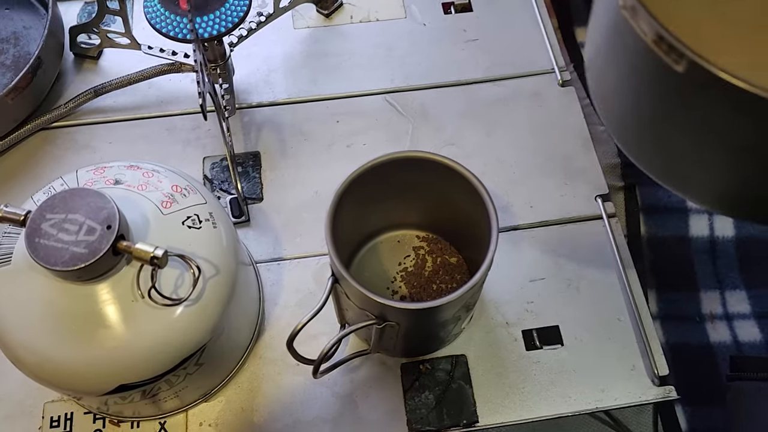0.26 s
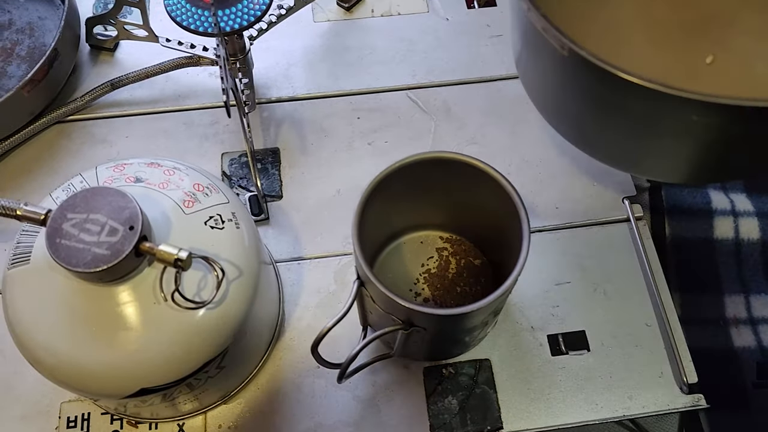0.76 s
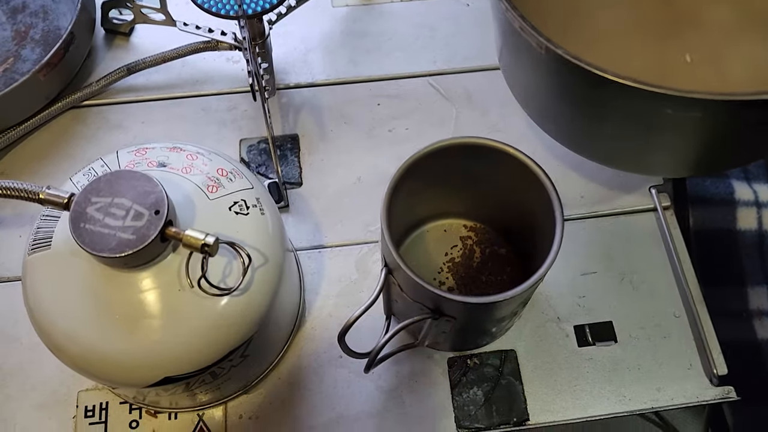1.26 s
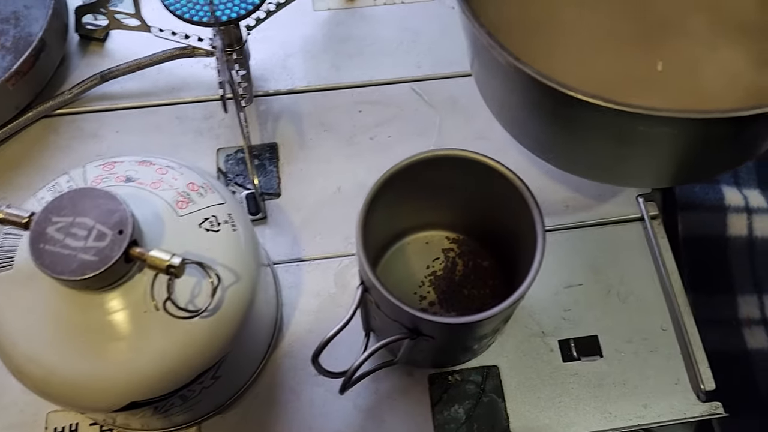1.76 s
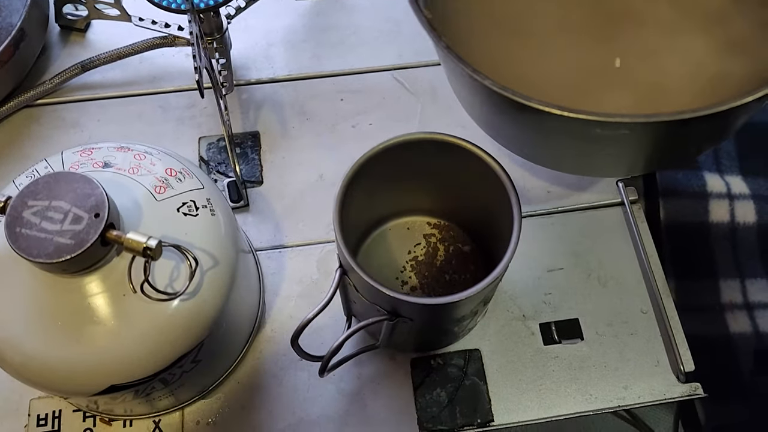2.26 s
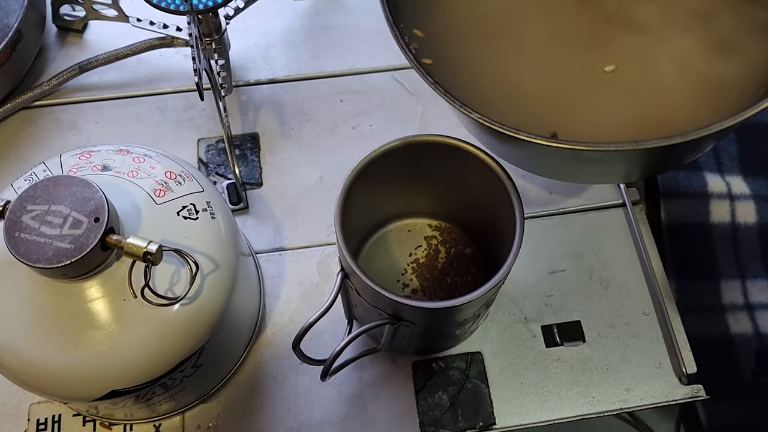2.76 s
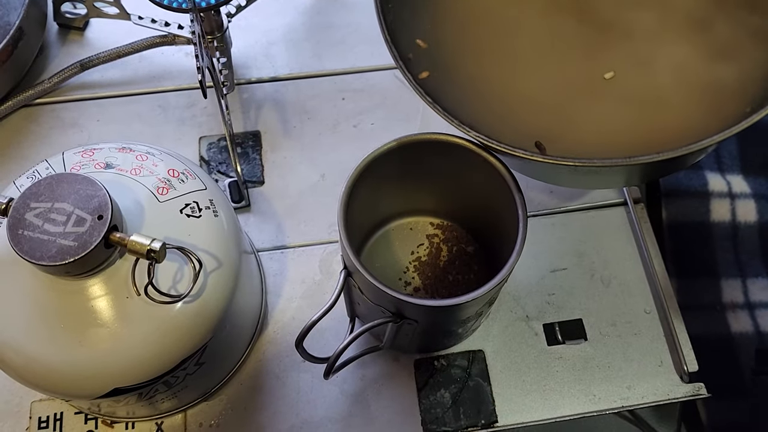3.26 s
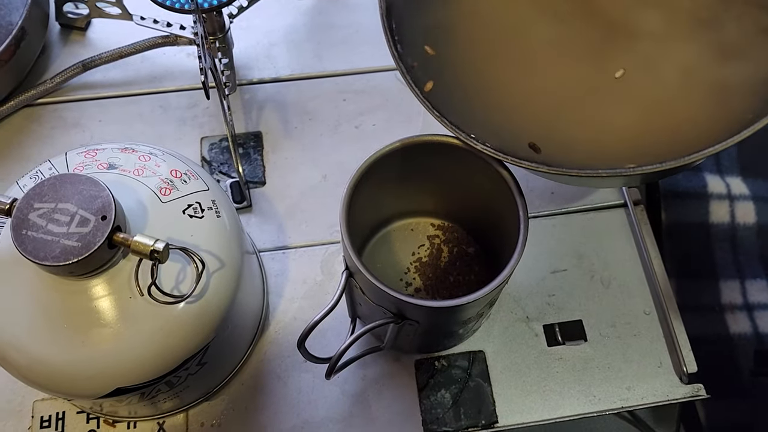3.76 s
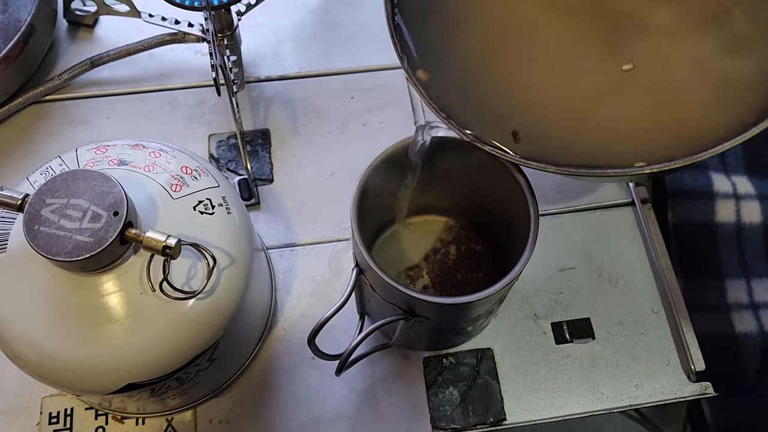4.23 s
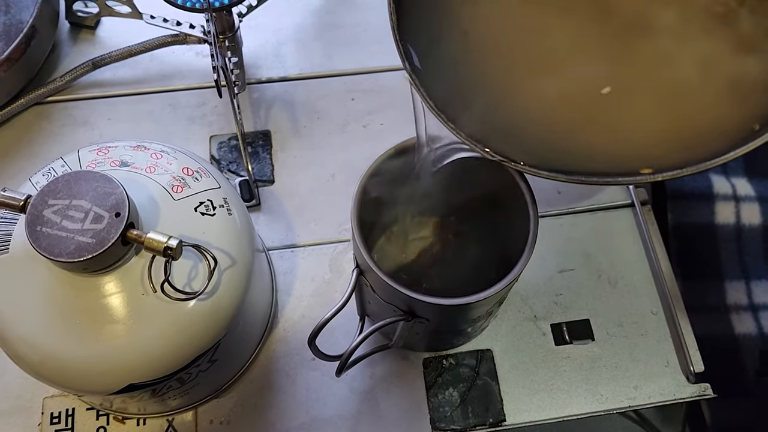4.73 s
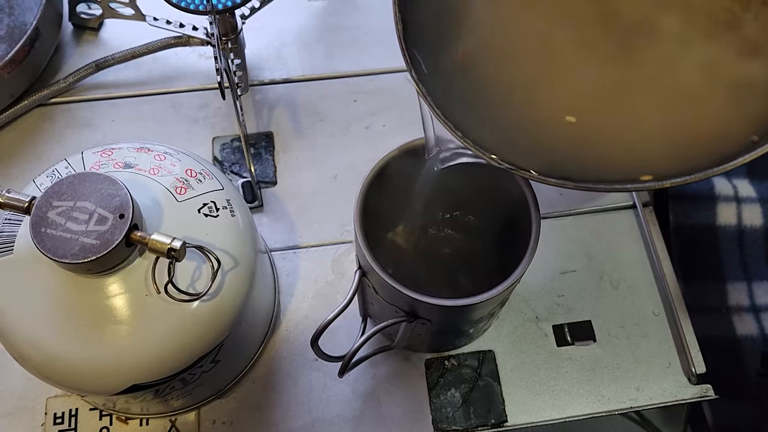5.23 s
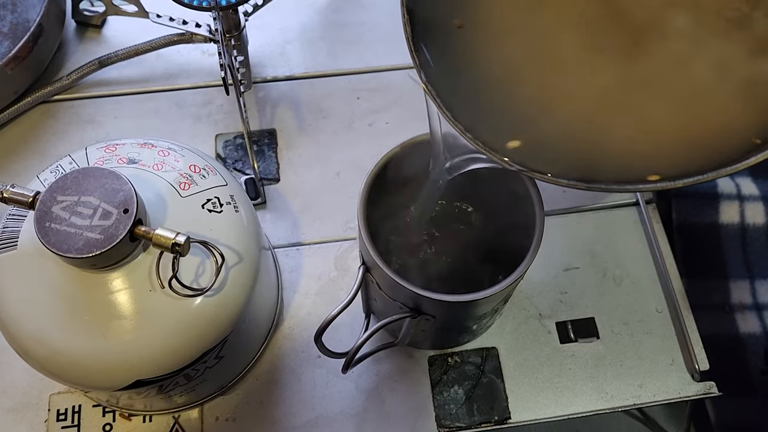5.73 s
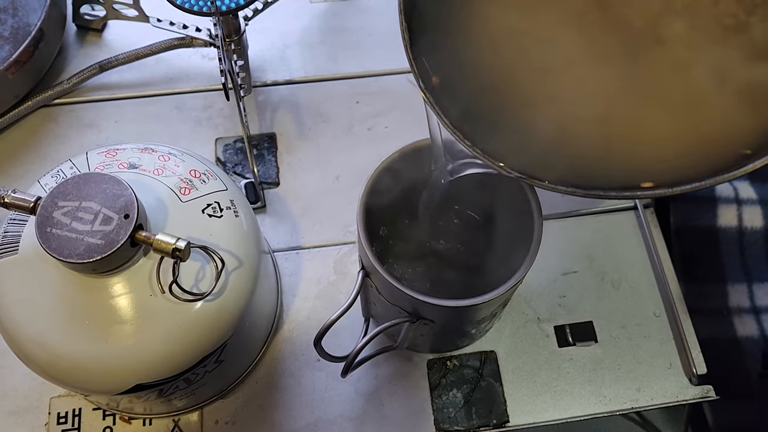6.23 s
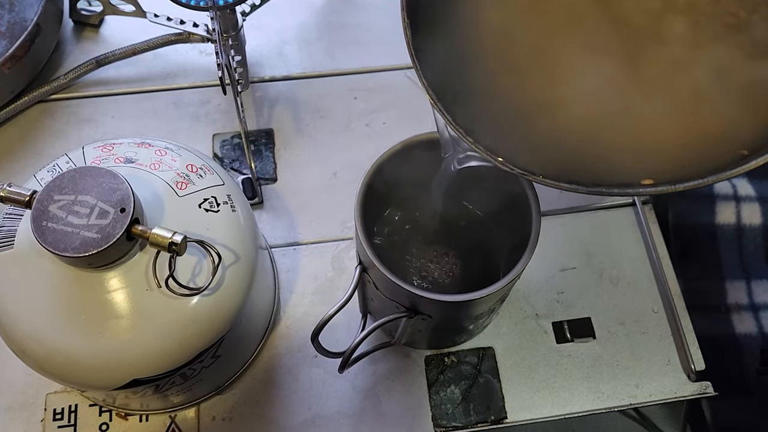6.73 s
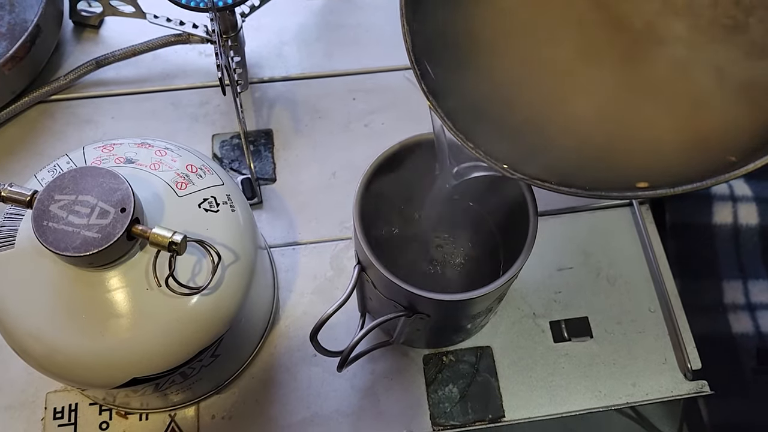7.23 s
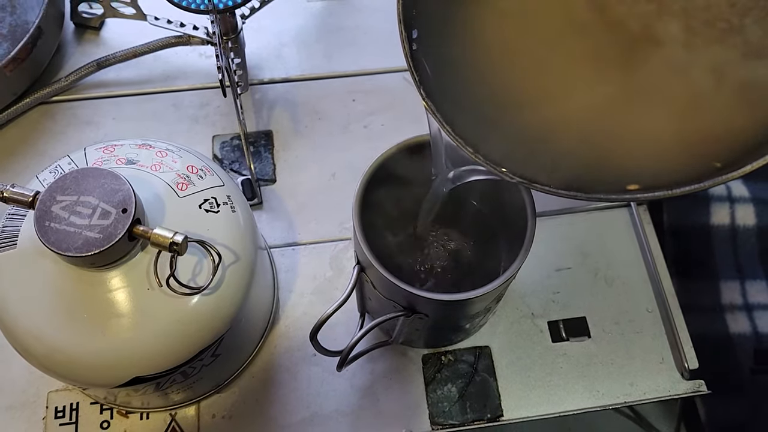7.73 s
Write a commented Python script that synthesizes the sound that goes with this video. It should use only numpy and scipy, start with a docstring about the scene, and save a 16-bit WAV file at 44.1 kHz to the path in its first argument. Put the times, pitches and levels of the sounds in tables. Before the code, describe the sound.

Inside a tent, a hand-held microphone picks up the constant rumble and hiss of a nearby gas burner, the hiss shifting slightly in tone. A pot clicks and knocks lightly as it is lifted. A little past halfway, water splashes gently into a metal mug slightly to the left, with short plops and ticks. The pour ends, and in the last instant the burner drops in level and moves right.

```python
"""At a table with a gas camping stove, a hand-held two-port microphone close to the burner.
The flames roar low under the hiss of the gas jet, whose colour shifts as the hand turns the microphone.
A pot is lifted with a few small knocks, then hot water is poured into a metal mug: bubbles ring as
short plops and droplets tick on the wall.
In the last moment the burner sounds quieter, thinner and further right."""
import sys
import numpy as np
from scipy import signal
from scipy.fft import rfft, irfft, next_fast_len
from scipy.io import wavfile
from scipy.ndimage import uniform_filter1d

SR = 44100
rng = np.random.default_rng(int(sys.argv[2]) if len(sys.argv) > 2 else 0)


def persist_wave(psi):
    """Save psi, clipped to +-1, as 16-bit WAV."""
    counts = np.round(np.clip(psi, -1, 1) * 32767).astype(np.int16)
    wavfile.write(sys.argv[1], SR, np.atleast_2d(counts).T)


N = 352342
POUR_START_S, POUR_STOP_S = 4.5, 7.3
POT_PAN_DB, HANDLE_PAN_DB, MUG_PAN_DB, SNAP_PAN_DB = 8.5, -2, 9, 7  # left minus right


def flame(level_db=-42.5):
    """The ring of small flames rumbles in lumps, close to the microphone."""
    # Each row: frequency in Hz, relative level at the left and right port in dB.
    roar_spectrum = [(15, -52, -47), (28, -27, -38), (46.5, -15, -23), (68.3, -11.5, -12), (111, -5.5, -6),
                     (125.5, -1.5, -1.5), (137.6, 3, 0), (147, -4, -6), (162, -5.5, -7.5),
                     (192, -10, -10.5), (276, -10.5, -11.5), (318, -17.5, -17), (410, -15, -20.5),
                     (720, -15.5, -23), (846, -20.5, -23), (926, -24, -25), (960, -35.5, -43),
                     (1250, -49, -49.5)]
    hz, _ = stft_grid(4096)
    field_db = spectrum_at(roar_spectrum, hz)[..., None]
    roar = turbulence(field_db, size=4096, patchy_db=0.54, flicker_db=0.14, flicker_s=0.041)
    return roar * gain_of(level_db)


def jet(level_db=-49.5, pass_s=1.47, pass_width_s=0.3):
    """Gas hisses through the nozzle; its colour shifts as the microphone turns and the pot passes."""
    # The bare hiss. Each row: frequency in Hz, relative level left and right in dB.
    hiss_spectrum = [(680, -11, -1), (960, -4, -11), (1080, -2, -0.5), (1460, -3, -25.5), (1880, 0, -14),
                     (2390, -11.5, -11.5), (3340, 0, -10), (3720, -3, -11), (5440, 0, 0.5),
                     (6760, -1.5, -4), (7900, -1, -4.5), (10000, -6.5, -6.5), (12100, -9, -10),
                     (13500, -8.5, -15), (15900, -1.5, -8)]
    # Resonances and notches of the burner tube and its surroundings. Each row: centre and width in Hz,
    # then left and right dB at rest, per unit of turn and with the pot near, then shift in Hz per unit.
    resonances = [(4636, 317, 16, 9.5, 1.5, -7, -2, -7, -18), (6350, 490, 4.5, 1.5, -4.5, 2, -1, -5, -60),
                  (8930, 770, 4, 7, -1, -2.5, -2, -3, -480), (11300, 690, -4, 9.5, -2, 2.5, 2, 0, 89),
                  (7540, 580, 4.5, -0.5, -3.5, -7, 1, -5, 150), (3296, 280, -7.5, 0, -3, 2, -1, -3, 30),
                  (5700, 410, -1.5, -21, 4, 6, 8.5, 6, 26), (6860, 360, -13, 4, 15, 1.5, 1, 5, 108),
                  (9500, 510, -7.5, -3, 7, 7, 6, 6, -100), (10300, 420, 0, -8, -3, 4, -3, 2, 30),
                  (3560, 220, -1.5, 2, 5.5, 4, 7, -1, 30), (3800, 210, 1, 1, -8, -6, -4, 1, 30),
                  (2130, 130, 1, 3, 4, 5, -3, -2, 30), (13800, 600, 5.5, 6, -2, -4, 1, 3, 30),
                  (13000, 840, 1, -2, 2, 7, -1, -1, 30)]
    # Table top, canister and pot throw the hiss back. Each row: delay in ms, left and right share,
    # change of delay in ms per unit of turn.
    echoes = [(.75, 0.2, 0.12, 0.052), (1.6, 0.064, 0.14, -0.12), (2.3, 0.16, 0.084, 0.11),
              (3.4, 0.21, 0.096, -0.14), (4.9, 0.43, 0.16, 0.15)]
    # The hand slowly turns the microphone. Each row: time in seconds, turn from -1 to 1.
    mic_turn = [(0, 1), (.6, 0.75), (1.1, 0.25), (1.7, -0.064), (2.1, -0.32), (2.7, -0.022), (4.7, 0.069),
                (5.6, -0.4), (7.9, -0.3)]
    hz, t = stft_grid(512)
    turn = np.interp(t, *np.transpose(mic_turn))
    pot_near = np.exp(-((t - pass_s) / pass_width_s) ** 2)
    field_db = spectrum_at(hiss_spectrum, hz)[..., None] - 60 * (hz < 600)[:, None]
    for centre, width, left, right, left_turn, right_turn, left_pot, right_pot, shift in resonances:
        bell = np.exp(-2 * ((hz[:, None] - centre - shift * turn) / width) ** 2)
        ports_db = np.array([left + left_turn * turn + left_pot * pot_near,
                             right + right_turn * turn + right_pot * pot_near])
        field_db = field_db + bell * ports_db[:, None]
    comb = 1
    for ms, left, right, drift in echoes:
        late = np.exp(-2j * np.pi * np.outer(hz, ms + drift * turn) / 1000)
        comb = comb + np.array([left * late, right * late])
    field_db = field_db + 20 * np.log10(abs(comb) + 1e-3)
    hiss = turbulence(field_db, size=512, patchy_db=1.16, flicker_db=0.33, flicker_s=0.019)
    return hiss * gain_of(level_db)


def turbulence(field_db, size, patchy_db, flicker_db, flicker_s):
    """Rushing gas at both ports: noise of RMS 1 coloured by field_db, with drifting patches and flicker."""
    # Each row: frequency in Hz, likeness of the two ports from 0 to 1.
    port_likeness = [(150, 1), (300, 0.98), (850, 0.97), (1000, 0.83), (1700, 0.8), (2600, 0.6),
                     (3900, 0.26), (4650, 0.64), (5000, 0.6), (5350, 0.37), (5700, 0.7), (6050, 0.64),
                     (7000, 0.34), (8300, 0.55), (8800, 0.83), (9200, 0.25), (9500, 0.4), (10000, 0.55),
                     (11000, 0.3), (13000, 0.1)]
    # Each row: frequency in Hz, phase lead of the left port in radians.
    port_lead = [(0, 0), (80, 0), (200, .22), (260, .48), (370, 1.15), (900, 1), (1200, 2.6), (1900, 1.7),
                 (2500, 3.7), (3200, 4.3), (3900, 5.4), (4650, 6.9), (5340, 6.8), (6030, 8.8), (7400, 9.8),
                 (8300, 10.2), (8800, 12.3), (10100, 12.4), (10600, 10), (12300, 9.2), (13400, 12),
                 (16000, 15)]
    hz, t = stft_grid(size)
    left_re, left_im, own_re, own_im, patches = rng.standard_normal((len(t), len(hz), 5)).T
    patches = uniform_filter1d(patches, size=10, axis=0)
    patches = unit_rms(uniform_filter1d(patches, size=12, axis=1))
    memory = np.exp(-(t[1] - t[0]) / flicker_s)
    flicker = unit_rms(signal.lfilter([1], [1, -memory], rng.standard_normal(len(t))))
    # The delay between the ports changes while the pot stands in the way.
    from_s, to_s, sway_s = 0.8, 1.82, -0.000043
    in_the_way = np.clip(np.minimum(t - from_s, to_s - t) / 0.28 + .5, 0, 1)
    lead = np.interp(hz, *np.transpose(port_lead))[:, None]
    lead = lead + 2 * np.pi * np.outer(hz, sway_s * in_the_way)
    likeness = np.clip(spectrum_at(port_likeness, hz).T, 0, 1)
    left = left_re + 1j * left_im
    right = likeness * left * np.exp(-1j * lead) + np.sqrt(1 - likeness ** 2) * (own_re + 1j * own_im)
    spectra = np.array([left, right]) * gain_of(field_db + patchy_db * patches + flicker_db * flicker)
    _, noise = signal.istft(spectra, nperseg=size, noverlap=3 * size // 4)
    return unit_rms(noise[:, :N])


def pour(swarm_db=-64, swarm_spread_s=0.044, fizz_db=-62):
    """The stream traps large bubbles, each in a swarm of small ones; fine fizz fills the gaps."""
    # Each row: start in seconds, level in dB, pitch in Hz, cycles to die by 60 dB,
    # level of the slap against the bubble in dB.
    large_bubbles = [(4.583, -49, 2700, 11, -8), (4.617, -45.5, 2350, 16, -8), (4.695, -44, 2460, 16, -8),
                     (4.697, -46, 3550, 18, -8), (4.8814, -39, 1750, 6, -12), (4.938, -38.5, 2350, 15, -17),
                     (4.946, -43, 2050, 8, -11), (4.9845, -43, 1650, 2, -6), (5.110, -49, 2500, 8, -8),
                     (5.122, -47, 1500, 8, -2), (5.127, -49, 1550, 7, -8), (5.1585, -46, 1590, 14, -11),
                     (5.1642, -49, 1450, 10, -10), (5.389, -43, 1560, 9, -10), (5.415, -47, 1300, 8, -10),
                     (5.4475, -35.5, 1390, 12, -20), (5.448, -36.5, 3550, 17, -16),
                     (5.4658, -35, 1030, 14, 0), (5.4803, -30.5, 1050, 11, -14),
                     (5.5072, -35, 990, 7, -1.5), (5.5178, -44, 940, 8, -8), (5.583, -43, 1050, 4, -5),
                     (5.619, -43, 2020, 5, -13), (5.829, -43.5, 1010, 14, -6), (5.938, -52, 1800, 5, -4),
                     (5.944, -47, 1110, 16, -10), (5.9745, -47, 1050, 10, -8),
                     (6.0242, -49.5, 1060, 14, -6), (6.059, -47, 1010, 9, -6),
                     (6.0713, -43.5, 1410, 12, -1), (6.128, -50, 1000, 8, -7), (6.195, -52, 1900, 8, -6),
                     (6.213, -51, 1050, 14, -6), (6.2996, -39.5, 1250, 8, -6), (6.319, -42, 1100, 5, -9),
                     (6.340, -52, 1750, 12, -8), (6.349, -53, 1500, 10, -8), (6.3885, -47, 1000, 3, -2),
                     (6.402, -47, 1052, 6, -3), (6.424, -43.5, 1080, 6, -5), (6.456, -44.5, 1000, 5, -2),
                     (6.488, -52, 1150, 5, -4), (6.555, -54, 2110, 7, -8), (6.586, -46, 1500, 7, -8),
                     (6.8524, -43, 1040, 1.5, -5), (6.8869, -43, 1800, 8, -2), (6.903, -56, 1300, 5, -5),
                     (6.930, -53, 1700, 9, -8), (6.9524, -41, 1010, 5, -13), (6.9517, -42, 1480, 13, -12),
                     (6.973, -47, 1460, 14, -14), (6.9765, -51, 1200, 12, -10), (6.985, -49, 1500, 11, -10),
                     (6.993, -52, 1400, 8, -6), (7.011, -50, 1400, 9, -8), (7.018, -53, 1500, 11, -8),
                     (7.043, -50, 1360, 20, -12), (7.066, -52, 1410, 6, 1)]
    plops = np.zeros((2, N))
    for start, db, hz, cycles, slap_db in large_bubbles:
        add(plops, start, gain_of(db) * panned(plop(hz, cycles / hz, slap_db), MUG_PAN_DB, lag=4))
    ticks = droplets()
    parent_s, parent_db = np.repeat(large_bubbles, 7, axis=0).T[:2]  # seven small to each large one
    swarm_times = parent_s + swarm_spread_s * rng.standard_normal(len(parent_s))
    swarm = small_bubbles(swarm_times, swarm_db + .35 * (parent_db + 45))
    progress = rng.random(size=400)
    fizz_times = POUR_START_S + (POUR_STOP_S - POUR_START_S) * progress
    swell_db = 20 * np.log10(np.sin(np.pi * progress) + 0.076)
    fizz = small_bubbles(fizz_times, fizz_db + swell_db)
    return mug(plops + ticks + swarm + fizz)


def plop(hz, t60, slap_db):
    """Water slaps, and the bubble it traps rings: a dying sine that starts sharp and settles."""
    sharp_share, settle_cycles, rise_cycles = 0.11, 1.1, 0.34
    slap_ratio, slap_cycles = 1.45, 1.4
    t = np.arange(1200) / SR
    turns = hz * t + sharp_share * settle_cycles * (1 - np.exp(-hz * t / settle_cycles))
    rise = (1 - np.exp(-hz * t / rise_cycles)) ** 2
    fade = gain_of(-60 * (t / max(t60, .002)) ** 1.6)  # holds at first, then stops short
    bubble = unit_peak(np.sin(2 * np.pi * turns) * fade * rise)
    slap_turns = slap_ratio * hz * (t - .001)
    slap = -np.cos(2 * np.pi * slap_turns) * np.exp(-(slap_turns / slap_cycles) ** 2)
    return bubble + gain_of(slap_db) * slap


def small_bubbles(times, levels_db, empty_hz=2930, filled_hz=1700, fill_s=1):
    """Bubbles of random strength and pitch; the highest pitch sinks as water covers the bottom."""
    out = np.zeros((2, N))
    for start, db, (faintness, pitch) in zip(times, levels_db, rng.random((len(times), 2))):
        top_hz = filled_hz + (empty_hz - filled_hz) * np.exp(-max(start - POUR_START_S, 0) / fill_s)
        hz = 1000 * (top_hz / 1000) ** pitch
        gain = gain_of(db - 1.9 * np.log(faintness + 0.036))  # a few stand out
        add(out, start, gain * panned(plop(hz, t60=0.01, slap_db=-3), MUG_PAN_DB, lag=4))
    return out


def droplets():
    """Droplets snap on the wall of the mug, each a tiny burst of band noise."""
    # Each row: start in seconds, level in dB, band centre in Hz.
    snaps = [(4.67, -34, 5230), (4.870, -34, 6600), (4.875, -43, 13900), (4.9395, -34, 4200),
             (5.165, -37, 14000), (5.291, -35.5, 5470), (5.364, -34, 14000), (5.379, -27.5, 6750),
             (5.385, -34, 12060), (5.42, -32, 13000), (5.448, -48, 3020), (5.48, -40, 2700),
             (5.757, -42.5, 3500), (5.830, -38, 14000), (5.831, -49, 2300), (6.073, -47, 2200)]
    out, t = np.zeros((2, N)), np.arange(300) / SR
    for (start, db, hz), noise in zip(snaps, rng.standard_normal((len(snaps), len(t)))):
        band = signal.butter(2, [.7 * hz, min(1.45 * hz, 20000)], "bandpass", fs=SR)
        snap = unit_peak(signal.lfilter(*band, noise * t * np.exp(-t / 0.00033)))
        add(out, start, gain_of(db) * panned(snap, SNAP_PAN_DB, lag=2))
    return out


def mug(water):
    """The water heard directly, plus the modes of the metal mug that it sets ringing."""
    # Each row: frequency in Hz, gain at resonance in dB, seconds to die by 60 dB.
    modes = [(1080, -5, 0.013), (1420, -1, 0.053), (1820, -11, 0.015)]
    t = np.arange(1500) / SR
    ring = sum(gain_of(db - 60 * t / t60) * np.sin(2 * np.pi * hz * t) * 2 * np.log(1000) / t60 / SR
               for hz, db, t60 in modes)
    return water + signal.oaconvolve(water, ring[None], axes=1)[:, :N]


def pot_knocks(contact_db=-3, contact_s=0.0043):
    """Left of the microphone the pot wall rings dully when knocked, over a scratch of contact."""
    # Each row: start in seconds, level in dB, share of the free ringing time from 0 to 1.
    knocks = [(3.2011, -40.5, .9), (3.3, -45.5, 0.7), (3.389, -51, 0.9)]
    # Each row: frequency in Hz, relative level in dB, seconds to die by 60 dB when ringing freely.
    wall_modes = [(940, 8.5, 0.073), (1100, -2, .03), (1444, -2, 0.13), (1740, -19, 0.026),
                  (2010, -4, 0.027), (2300, -2, 0.038), (2620, -6, 0.035), (3150, -8, .025),
                  (6340, -12, .02)]
    out, t = np.zeros((2, N)), np.arange(6000) / SR
    band = signal.butter(2, [1500, 6500], "bandpass", fs=SR)
    for (start, db, ring_share), noise in zip(knocks, rng.standard_normal((len(knocks), len(t)))):
        contact = signal.lfilter(*band, noise) * np.exp(-t / contact_s)
        knock = struck(wall_modes, t, ring_share, rise_s=0.0011) + gain_of(contact_db) * contact
        add(out, start, gain_of(db) * panned(knock, POT_PAN_DB, lag=4))
    return out


def handle_clicks():
    """Handle and hand click drily near the centre: modes that die almost at once."""
    # Each row: start in seconds, level in dB.
    clicks = [(0.7589, -51), (0.9649, -48), (2.3825, -49), (2.511, -46.5), (3.4709, -36.5), (3.80, -54)]
    # Each row: frequency in Hz, relative level in dB, seconds to die by 60 dB.
    handle_modes = [(900, -1.5, 0.0093), (2120, -0.5, 0.011), (2350, -3.5, 0.013), (2780, -4, 0.0096),
                    (3350, -5, 0.0093), (3870, -13, .008)]
    out, t = np.zeros((2, N)), np.arange(6000) / SR
    click = struck(handle_modes, t, ring_share=1, rise_s=0.00049)
    for start, db in clicks:
        add(out, start, gain_of(db) * panned(click, HANDLE_PAN_DB, lag=0))
    return out


def struck(modes, t, ring_share, rise_s):
    """A struck body: each mode rings for ring_share of its free time; peak 1."""
    ring = sum(gain_of(db - 60 * t / (t60 * ring_share)) * np.sin(2 * np.pi * hz * t)
               for hz, db, t60 in modes)
    return unit_peak(ring * (1 - np.exp(-t / rise_s)))


def quieted(burner):
    """The burner as heard in the last moment: quieter, thinner and further right."""
    # Each row: frequency in Hz, change left and right in dB.
    drop = [(100, -16, -14), (300, -12.5, -11), (865, -25, -16), (1440, -17, 6), (2900, -12, -2),
            (4650, -18, -3.5), (5640, -16, -16), (7540, -12, -12), (9200, -12, -8), (11100, -9, -8),
            (14500, -15, -8)]
    size = next_fast_len(N)
    gains = gain_of(spectrum_at(drop, np.fft.rfftfreq(size, 1 / SR)))
    return irfft(rfft(burner, size) * gains, size)[:, :N]


def near_reflections(x, level_db, t60):
    """Mug, table and cloth scatter each small sound into a short ragged tail, different at each port."""
    t = np.arange(2600) / SR
    taps = rng.standard_normal((2, len(t))) * (rng.random((2, len(t))) < .03)
    taps = taps * (t > .002) * gain_of(-60 * t / t60)
    taps = taps / np.linalg.norm(taps, axis=1, keepdims=True)
    return x + gain_of(level_db) * signal.oaconvolve(x, taps, axes=1)[:, :N]


def gain_of(db):
    return 10 ** (np.asarray(db) / 20)


def unit_rms(x):
    return x / np.sqrt(np.mean(x ** 2) + 1e-20)


def unit_peak(x):
    return x / abs(x).max()


def spectrum_at(points, hz):
    """Every value column of a spectrum table at the frequencies hz."""
    table_hz, *columns = np.transpose(points)
    return np.array([np.interp(np.log(hz + 1), np.log(table_hz + 1), column) for column in columns])


def stft_grid(size):
    """Bin frequencies and frame times of the short-time spectra."""
    return np.fft.rfftfreq(size, 1 / SR), np.arange(4 * N // size + 5) * size / 4 / SR


def add(mix, start_s, sound):
    part = mix[:, round(start_s * SR):][:, :sound.shape[1]]
    part += sound[:, :part.shape[1]]


def panned(sound, pan_db, lag):
    """One sound at both ports, the right one late by lag samples."""
    late = np.concatenate([np.zeros(lag), sound[:len(sound) - lag]])
    return np.array([sound * gain_of(pan_db / 2), late * gain_of(-pan_db / 2)])


def scene(drop_s=7.85):
    """The burner runs under pot and pour; from drop_s it sounds quieter, thinner and further right."""
    burner = flame() + jet()
    handling = near_reflections(pot_knocks() + handle_clicks() + pour(), level_db=-6, t60=0.034)
    before_drop = np.clip((drop_s - np.arange(N) / SR) / .003 + .5, 0, 1)  # 3 ms crossfade
    return before_drop * (burner + handling) + (1 - before_drop) * quieted(burner)


def record(dry, edge_hz=15750):
    """The recorder cuts the top treble steeply."""
    lowpass = signal.firwin(1023, edge_hz, window=("kaiser", 9), fs=SR)
    return signal.oaconvolve(dry, lowpass[None], "same")


dry = scene()
out = record(dry)
persist_wave(out)
```